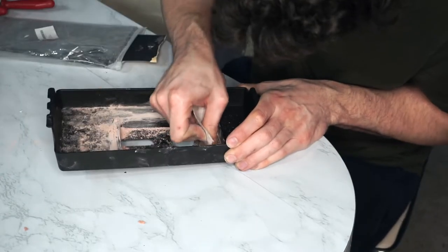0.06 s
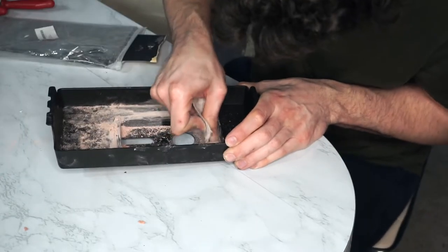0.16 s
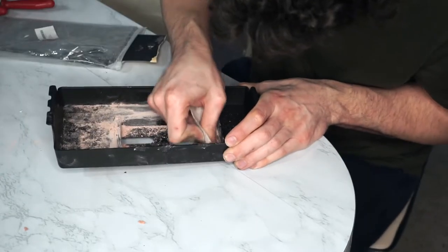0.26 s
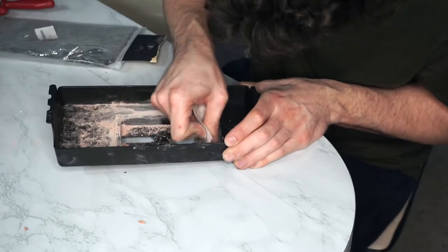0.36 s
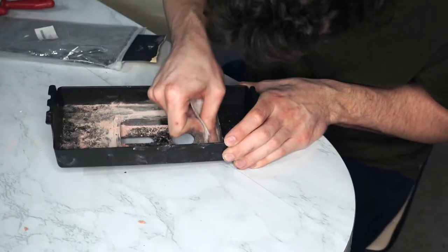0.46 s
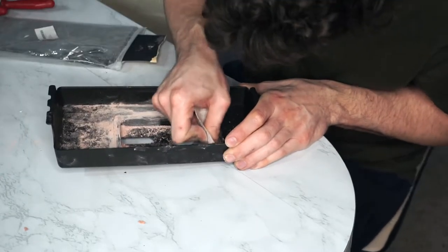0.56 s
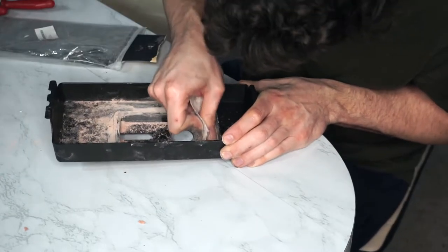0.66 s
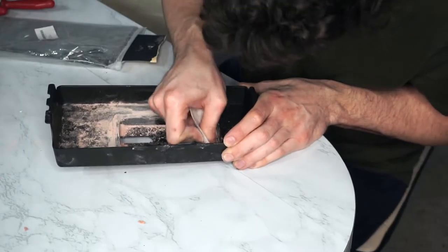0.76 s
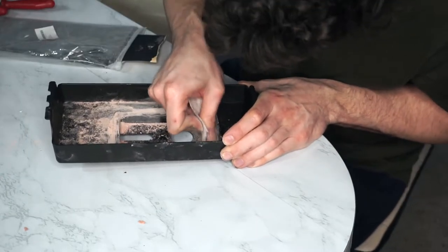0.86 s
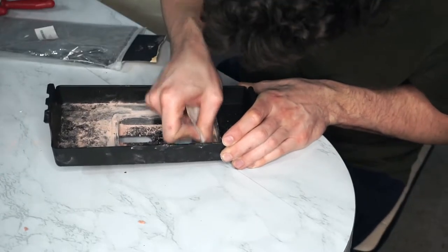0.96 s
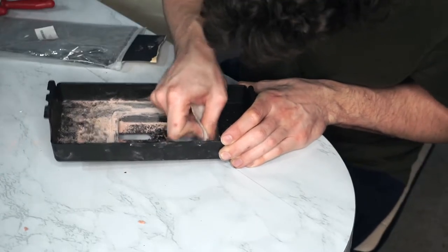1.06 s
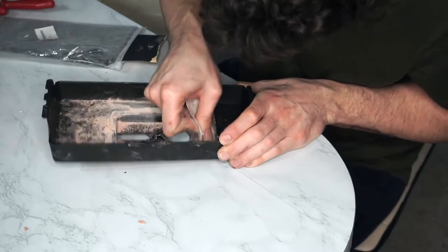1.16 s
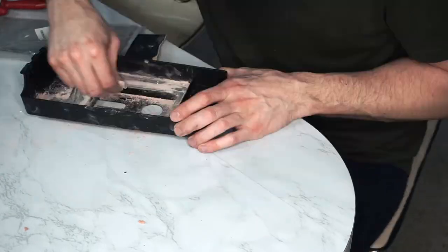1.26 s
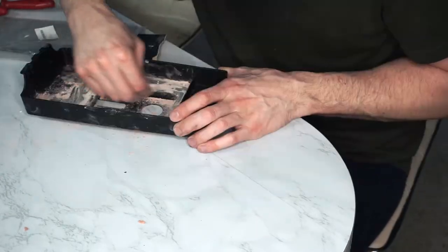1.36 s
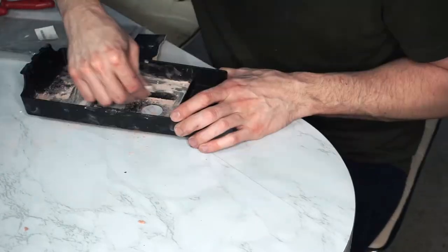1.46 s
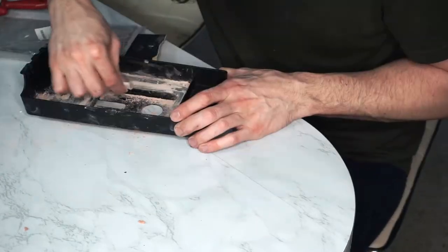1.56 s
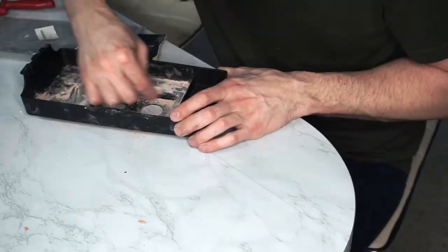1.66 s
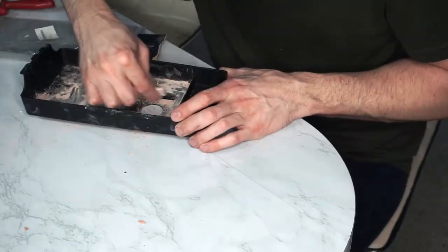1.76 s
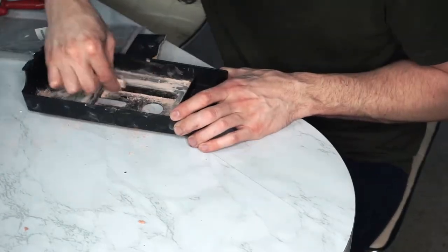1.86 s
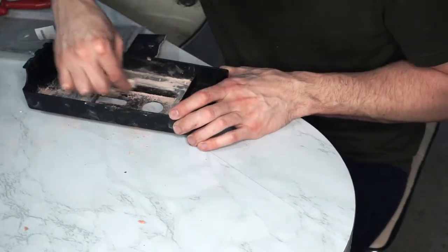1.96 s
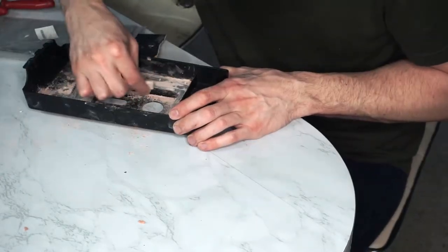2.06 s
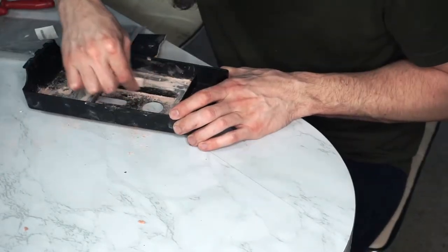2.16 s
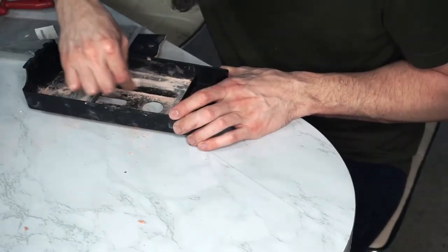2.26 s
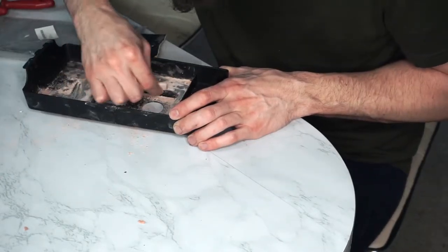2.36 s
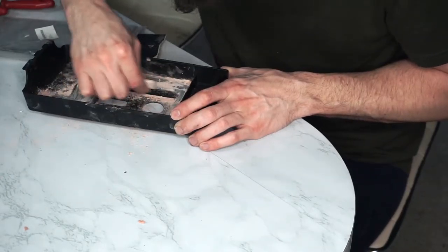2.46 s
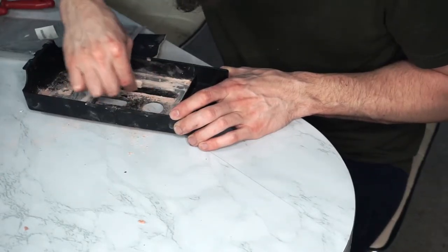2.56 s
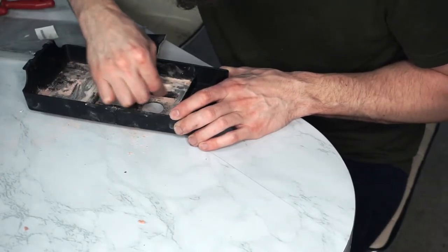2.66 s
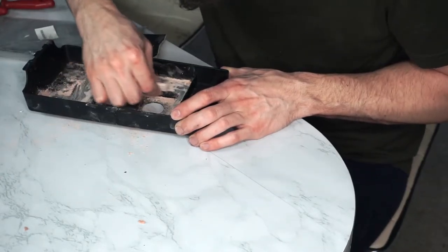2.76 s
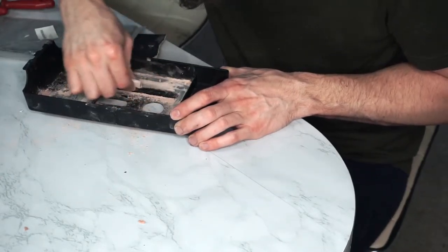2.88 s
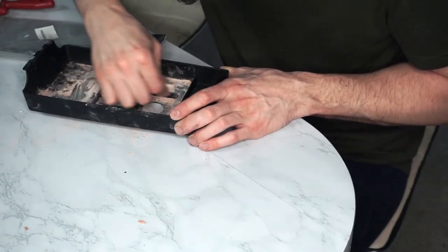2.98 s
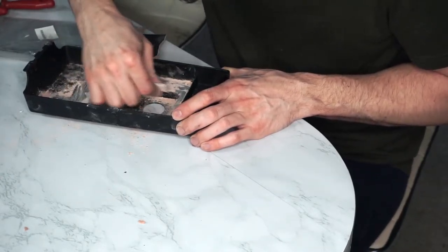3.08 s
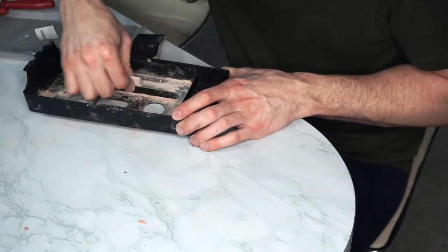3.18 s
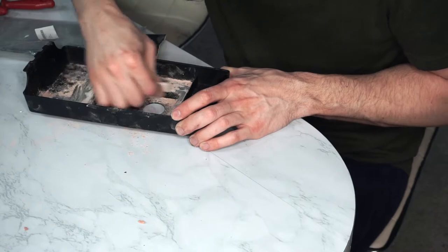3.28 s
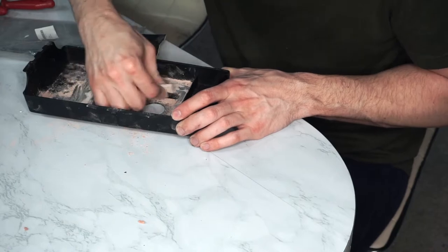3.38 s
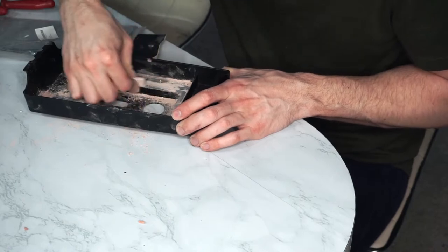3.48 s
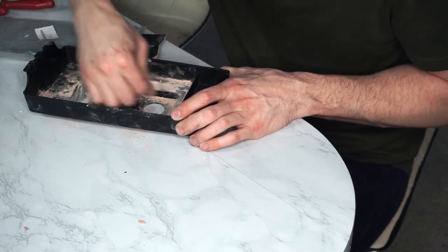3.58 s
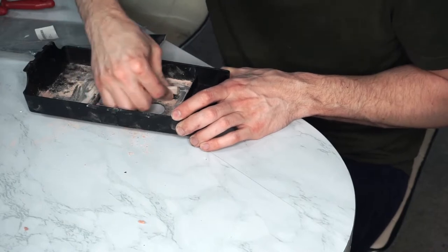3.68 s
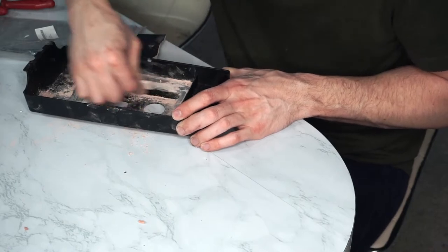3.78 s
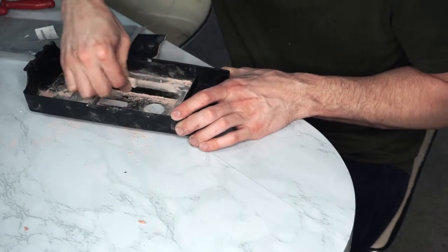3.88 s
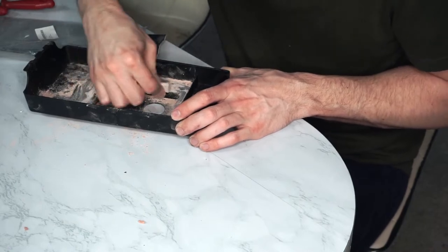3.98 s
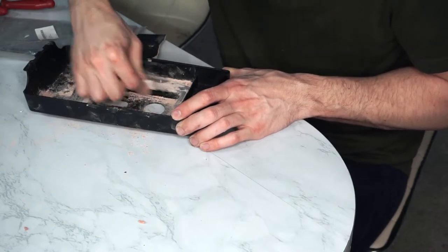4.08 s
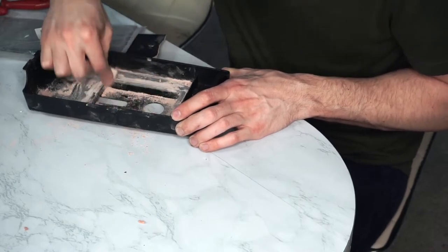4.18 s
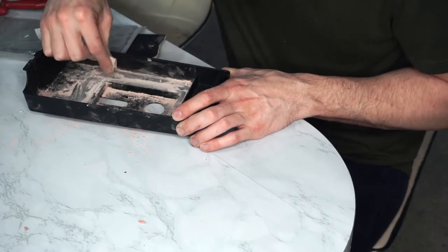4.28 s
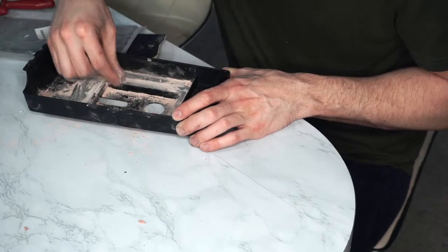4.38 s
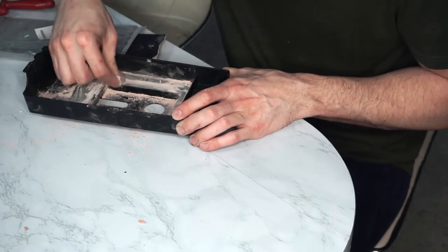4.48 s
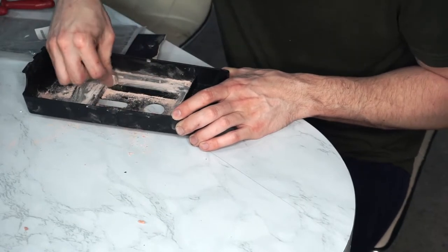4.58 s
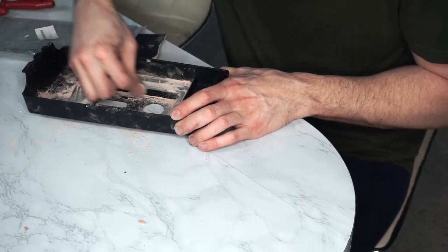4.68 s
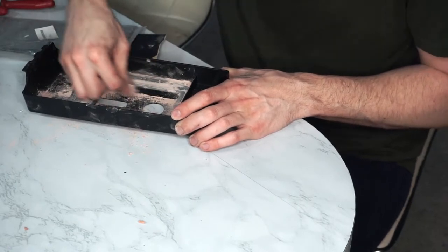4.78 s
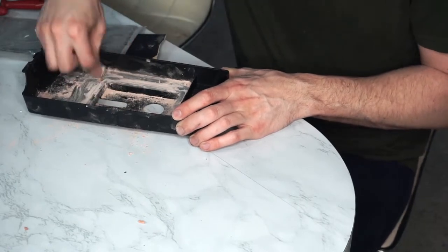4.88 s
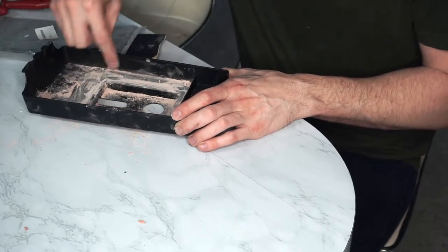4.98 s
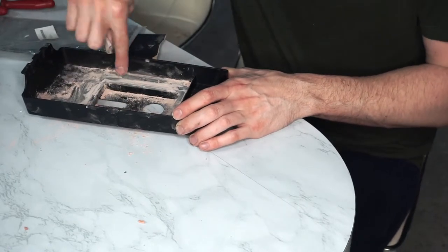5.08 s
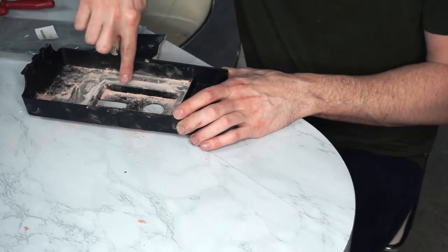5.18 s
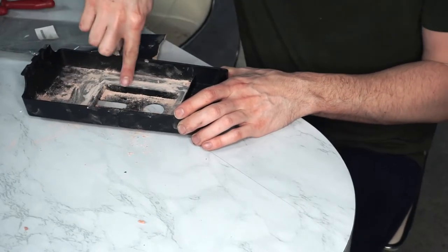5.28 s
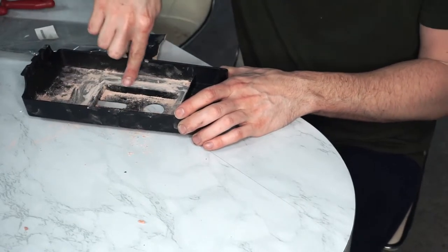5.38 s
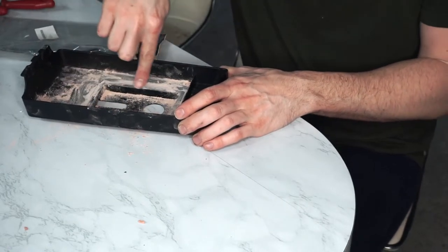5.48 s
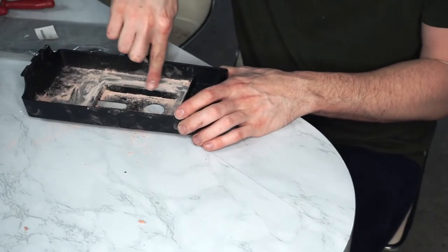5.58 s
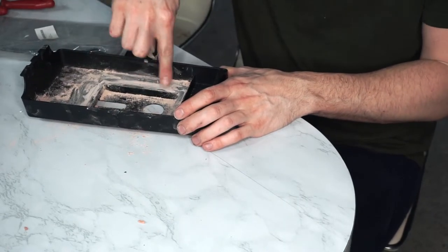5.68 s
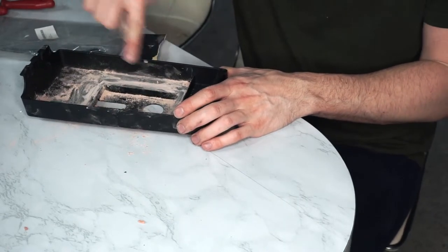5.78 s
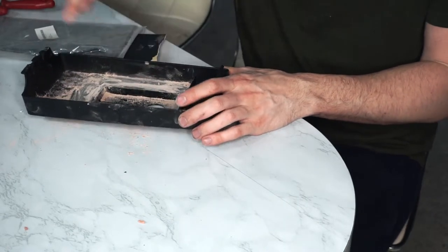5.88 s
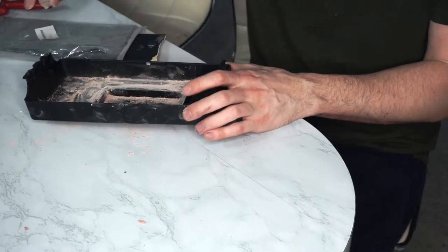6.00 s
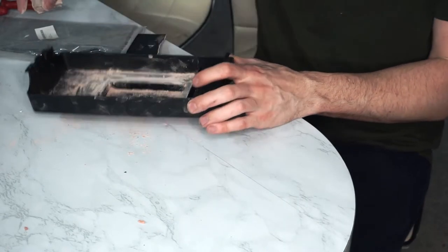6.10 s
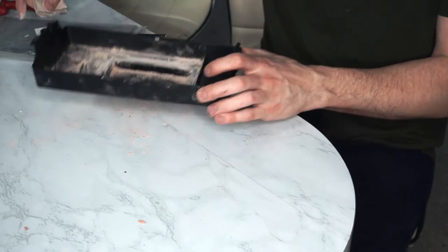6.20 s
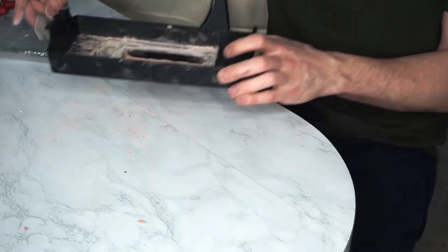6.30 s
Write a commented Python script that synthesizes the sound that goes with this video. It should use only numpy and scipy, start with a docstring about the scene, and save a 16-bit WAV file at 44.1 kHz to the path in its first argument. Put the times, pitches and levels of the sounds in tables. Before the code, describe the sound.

Quick, dry hand-sanding strokes scratch inside a plastic shell on a table, with occasional bumps and a faint fingertip wipe afterward.

```python
"""A dry, rasping to-and-fro, close up: sandpaper on hard filler inside a plastic tray on a table.
Short strokes in a corner give way to longer ones along the floor and a last few on the rim. The grit
hisses, rings the shell and rumbles the table. The paper snags at the turns, the tray is bumped a few
times, and at the end a fingertip wipes the dust, all in a small quiet room."""
import sys
import numpy as np
from scipy import signal
from scipy.fft import rfft, irfft
from scipy.io import wavfile
from scipy.ndimage import map_coordinates

SR = 44100
rng = np.random.default_rng(int(sys.argv[2]) if len(sys.argv) > 2 else 0)


def store_pcm(level_fs):
    """Save levels as 16-bit WAV."""
    pcm = np.round(np.clip(level_fs, -1, 1) * 32767).astype(np.int16)
    wavfile.write(sys.argv[1], SR, np.atleast_2d(pcm).T)


N = 279580
T = np.arange(N) / SR
HAND_SHIFTS_S = (1.28, 4.4)  # from corner to floor, from floor to rim

# Sanding strokes, pull and push in turn.
# Each row: start in seconds, length in seconds, hiss gain in dB, extra gain for the shell in dB.
STROKES = [(.021, 0.058, -40.5, -11), (0.142, 0.075, -43.5, -9), (0.259, .071, -36.5, -8),
           (0.384, 0.077, -39, -12.5), (0.506, 0.074, -34.5, -10.5), (.627, 0.071, -39, -10.5),
           (0.742, 0.064, -33.5, -8), (0.862, 0.058, -39, -9.5), (0.97, 0.075, -37, 3.5),
           (1.098, 0.048, -36, 4), (1.326, 0.1, -32.5, -3.5), (1.487, 0.11, -33.5, -3),
           (1.621, 0.14, -31, -5), (1.758, 0.18, -31, -7), (1.947, .13, -36, 0.5), (2.145, 0.11, -37, -1.5),
           (2.281, 0.13, -36.5, 0), (2.442, 0.14, -35.5, 4.5), (2.59, 0.14, -35.5, -2.5),
           (2.774, .13, -33.5, 0), (2.927, 0.12, -32.5, -3.5), (3.065, 0.17, -30.5, -1.5),
           (3.25, 0.11, -30.5, -5), (3.403, .14, -31, -2), (3.579, .11, -32, -5), (3.752, 0.14, -29, -8),
           (3.928, .1, -31.5, -1.5), (4.075, 0.15, -28.5, -5), (4.533, 0.079, -43, -30),
           (4.633, .126, -29.5, -4.5), (4.778, 0.17, -32.5, -2.5)]


def undb(db):
    """Decibels to amplitude."""
    return 10 ** (np.asarray(db) / 20)


def unit(x):
    """Scale to rms 1."""
    return x / np.sqrt(np.mean(x ** 2))


def curve_at(points, hz):
    """Read (Hz, value) points on a log-frequency axis."""
    point_hz, value = np.transpose(points)
    return np.interp(np.log(np.maximum(hz, 1)), np.log(point_hz), value)


def convolve(x, response):
    """Play a signal through an impulse response, cut to the scene's length."""
    return signal.fftconvolve(x, response)[:N]


def butter(x, order, hz, kind="low"):
    """Butterworth filter, low-pass by default."""
    return signal.lfilter(*signal.butter(order, hz, kind, fs=SR), x)


def colour(x, points, size=4096):
    """Minimum-phase EQ through (Hz, dB) points, built by folding the cepstrum."""
    cepstrum = irfft(np.log(undb(curve_at(points, np.fft.rfftfreq(size, 1 / SR)))))
    cepstrum[1:size // 2] *= 2
    cepstrum[size // 2 + 1:] = 0
    return convolve(x, irfft(np.exp(rfft(cepstrum))))


def resonate(x, modes):
    """Parallel resonances of alternating sign."""
    return sum((-1) ** k * undb(db) * signal.lfilter(*signal.iirpeak(hz, hz / width, SR), x)
               for k, (hz, width, db) in enumerate(modes))


def radiate(path, force, shape):
    """Send a force through a filter scaled to pass white noise at unchanged power."""
    return path(force, shape) / np.linalg.norm(path(signal.unit_impulse(8192), shape))


def wander(rate_hz):
    """Random drift with a spread near 1."""
    knots = rng.standard_normal(8192)
    return np.interp(T * rate_hz, np.arange(len(knots)), knots)


def stereo(mid, side, width):
    """Left and right from mid and side; an EQ on the side sets the width by frequency."""
    return mid + np.array([[1], [-1]]) * colour(side, width)


def room_tone(waver_db=1.5):
    """A soft, wavering rush of air with a little hum and faint electronic whine."""
    # Colour of the rush. Each row: frequency in Hz, gain in dB.
    spectrum = [(15, -64), (25, -36), (48, -27), (87, -21.5), (134, 0.5), (200, -4.5), (301, 1), (384, 0),
                (677, 1), (796, -1), (3720, -26), (5000, -21), (5570, -20), (9840, -29.5), (16000, -36)]
    # Its slow fade. Each row: time in seconds, level in dB.
    fade = [(0, -57), (4.4, -59), (5.2, -59.5), (5.8, -61.5), (6.34, -63)]
    # Its stereo width. Each row: frequency in Hz, side over mid in dB.
    width = [(60, 0), (130, -13.5), (380, -13), (1200, -18), (2400, -0.5), (4400, 3.5), (8000, -1),
             (15000, 3)]
    # Hum and whine. Each row: frequency in Hz, rms level in dB.
    tones = [(60, -87), (147, -84), (180, -79.5), (9711, -90), (12900, -98)]
    level_db = np.interp(T, *np.transpose(fade))
    mid, side = (unit(colour(rng.standard_normal(N), spectrum)) * undb(level_db + waver_db * wander(7.2))
                 for _ in range(2))
    hum = sum(np.sqrt(2) * undb(db) * np.sin(2 * np.pi * hz * T) for hz, db in tones)
    return stereo(mid, side, width) + hum


def room_tail(predelay_s, size=24000):
    """Dense reflections that die away at their own pace in each octave."""
    # The room's decay. Each row: frequency in Hz, seconds to fall 60 dB.
    decay = [(200, 0.13), (600, 0.49), (1400, 0.31), (4000, 0.31), (10000, 0.21)]
    t, hz = np.arange(size) / SR, np.fft.rfftfreq(size, 1 / SR)
    noise = rfft(rng.standard_normal(size))
    octave = np.round(np.log2(np.maximum(hz, 100)))
    tail = sum(irfft(noise * (octave == k)) * 1000. ** (-t / curve_at(decay, 2 ** k))
               for k in np.unique(octave))
    tail *= t > predelay_s
    return tail / np.linalg.norm(tail)


def reflections(x, predelay_s, count=4):
    """The moving hand and tray keep changing the room's pattern of reflections."""
    position = 2 * np.pi * (3 * T + 0.49 * wander(3.044))
    sends = (x * np.cos(position * (k + 1) / count) for k in range(count))
    return sum(convolve(send, room_tail(predelay_s)) for send in sends) * np.sqrt(2 / count)


def grit(per_s, spread_db, bed_db, chatter_db, chatter_hz):
    """Uneven grains tear at the filler over a bed of finer ones, chattering as they slide."""
    clicks = (rng.random(N) < per_s / SR) * rng.choice([-1, 1], N)
    sizes = undb(spread_db * np.minimum(rng.exponential(size=N), 5))
    bed = undb(bed_db) * rng.standard_normal(N)
    chatter = undb(chatter_db * wander(chatter_hz))
    return unit((unit(clicks * sizes) + bed) * chatter)


def fingertip(soft_hz=2600):
    """Soft skin drags dust off the filler, stirring only low shell resonances, with no hiss."""
    # The wipes. Each row: start in seconds, length in seconds, gain in dB.
    wipes = [(5.436, 0.068, -54), (5.496, 0.11, -56.5), (5.61, 0.081, -54.5)]
    # The shell under the finger. Each row: frequency in Hz, bandwidth in Hz, gain in dB.
    modes = [(1166, 60, 5.5), (2230, 150, -3)]
    pressure = sum(undb(db) * np.sin(np.pi * np.clip((T - s) / length, 0, 1)) for s, length, db in wipes)
    dust = grit(per_s=220, spread_db=5.5, bed_db=6, chatter_db=2.5, chatter_hz=69)
    return radiate(resonate, butter(pressure * dust + 1e-18, 2, soft_hz), modes)


def knocks(contact_s=0.00081, lowest_hz=110, size=12000):
    """The tray bumps the table and knuckles bump the tray; a harder blow favours the higher modes."""
    # The bumps. Each row: start in seconds, peak in dB, hardness as a tilt in dB per octave.
    blows = [(1.872, -14.5, 16), (1.8783, -16, 9), (2.396, -29, 13), (4.193, -21, 32), (4.4316, -23, -2),
             (4.442, -44, -6), (4.859, -31, 6), (4.876, -22.5, 9.5), (4.941, -31, 33)]
    # The struck tray. Each row: frequency in Hz, seconds to fall 60 dB, gain in dB.
    modes = [(115, 0.036, -27), (162, 0.08, -33), (205, 0.06, -21), (325, 0.059, -7.5), (428, 0.03, 4.5),
             (556, 0.0089, 6.5), (764, 0.021, 1.5), (966, 0.035, -0.5), (1165, 0.059, -1),
             (1347, 0.028, -0.5), (1980, 0.008, -7)]
    out, t = np.zeros(N + size), np.arange(size) / SR
    hz, t60, db = np.transpose(modes)[:, :, None]
    attack = 1 - np.exp(-(t / contact_s) ** 2)
    for s, peak_db, hardness in blows:
        decays = undb(db + hardness * np.log2(hz) - 60 * t / t60)
        partials = decays * np.sin(2 * np.pi * (hz * t + rng.random(hz.shape)))
        ring = butter(partials.sum(axis=0) * attack, 2, lowest_hz, "high")  # small shell, no deep bass
        out[int(s * SR):][:size] += undb(peak_db) * ring / np.abs(ring).max()
    return out[:N]


def cupped_hand(low_hz=401, high_hz=1058, half_width_hz=95, gain_db=-21):
    """On the tray floor the hollow under the hand resonates, opening on pulls and shrinking on pushes."""
    out = np.zeros(N)
    breath = unit(butter(rng.standard_normal(N), 2, half_width_hz))
    for k, (s, length, db, _) in enumerate(STROKES):
        if HAND_SHIFTS_S[0] < s < HAND_SHIFTS_S[1]:
            progress = np.linspace(0, 1, int(length * SR))
            closure = (1 + (-1) ** k * np.cos(np.pi * progress)) / 2
            hz = low_hz * (high_hz / low_hz) ** closure
            swell = undb(db + gain_db) * np.sqrt(np.abs(np.sin(np.pi * progress)))
            span = slice(int(s * SR), int(s * SR) + len(progress))
            out[span] += swell * breath[span] * np.sin(2 * np.pi * np.cumsum(hz) / SR)
    return out


def tray_echoes(x, strength, lag_s, glide, count=4):
    """Tray walls and knuckles reflect the scrape: a comb colour that slides as the hand travels."""
    n = np.arange(len(x))
    travel = np.cos(np.pi * n / len(x)) * min(len(x) / SR / .1, 1)  # slides under 0.1 s travel less
    centre_lags = rng.uniform(0.13, 1, (count, 1)) * lag_s * SR
    lags = centre_lags * (1 + glide * rng.uniform(-0.86, 1, (count, 1)) * travel)
    gains = strength * rng.choice([-1, 1], count)
    echoes = sum(gain * map_coordinates(x, [n - lag], order=3, mode="grid-wrap")
                 for gain, lag in zip(gains, lags))
    return unit(x + echoes)


def swing(length_s, bite, grip_s):
    """Sliding speed: half a sine, of which the share `bite` is already done when the paper grips."""
    t = np.arange(int(length_s * SR)) / SR
    arc = np.abs(np.sin(np.pi * (bite + (1 - bite) * t / length_s)))
    return arc * np.minimum(t / grip_s, 1)


def slides(snag_table_db=-30.5):
    """Every stroke and snag: start in seconds, speed curve, then hiss, shell, table and edge gains in dB."""
    # How the paper grips in the corner, on the floor and on the rim.
    # Each row: bite as a share of the swing, edge gain in dB, table gain in dB on pull and on push.
    grips = [(0.17, 5.5, -45, -54), (0.15, 0.5, -45.5, -47.5), (0.18, 3, -66, -70)]
    # The paper or a finger catches. Each row: start in seconds, length in seconds, hiss gain in dB,
    # extra gain for the shell in dB, edge gain in dB.
    snags = [(0.248, 0.016, -50.5, -18, 6), (.264, 0.0081, -43, -17, 7), (0.576, 0.052, -49.5, -2, -6),
             (0.976, 0.011, -43, -8, 4), (1.095, 0.023, -29.5, -1, -4), (1.145, 0.03, -49, 13.5, -7),
             (1.728, 0.0026, -20.5, -9.5, 8.5), (1.835, 0.011, -29.5, -17, 4),
             (1.8595, 0.024, -32.5, 1, -21), (1.876, 0.019, -46, 20, -10), (2.133, 0.018, -49.5, -14, 4),
             (2.153, 0.0075, -39, -1, 11), (2.292, 0.0074, -41, -15, -12), (2.395, 0.0064, -38, -11, -1),
             (2.427, 0.045, -38, -1, -4), (2.44, 0.011, -22, -24, -6.5), (2.758, 0.0073, -41, -12, 12),
             (3.07, 0.014, -41, 6.5, 4), (3.396, 0.0059, -40.5, -2, -19), (3.725, 0.0074, -36.5, -16, -10),
             (3.734, 0.055, -49, 8, -18), (4.057, 0.021, -43.5, -20, -14), (4.192, 0.0037, -27, 1, 11),
             (4.419, 0.023, -44, -20, 5.5), (4.524, 0.0045, -51.5, -13, 24), (4.836, 0.049, -44, 11, -11),
             (4.872, 0.0099, -26.5, -9, 2), (4.937, 0.0059, -37, 3, -10), (5.119, 0.019, -62, -19, 3),
             (5.184, 0.0064, -56, -24, 8), (5.643, 0.048, -65.5, -14, -20), (5.741, 0.0056, -61, 0, 8),
             (5.987, 0.0095, -61, -17, 4), (6.323, 0.0092, -63.5, 11, -4)]
    for k, (s, length, db, ring_db) in enumerate(STROKES):
        bite, edge_db, *table_db = grips[np.searchsorted(HAND_SHIFTS_S, s)]
        yield s, swing(length, bite, grip_s=0.0032), db, db + ring_db, table_db[k % 2], edge_db
    for s, length, db, ring_db, edge_db in snags:
        yield s, swing(length, bite=.33, grip_s=0.00129), db, db + ring_db, db + snag_table_db, edge_db


def tray_body(hiss, shell, table, hiss_db=-2.0, shell_db=-1.5, table_db=-4.5):
    """Tray and table colour the scrape; each place on the tray drives its own shell resonances."""
    # The shell rubbed in each place. Each row: frequency in Hz, bandwidth in Hz, gain in dB.
    corner_modes = [(1166, 71, 2), (1440, 330, -3.5), (1870, 340, 3), (2220, 630, -6), (3560, 160, -8)]
    floor_modes = [(1006, 216, -7), (1178, 27.6, 5), (1286, 78, -4.5), (1460, 9.7, -2), (1546, 100, -9),
                   (1707, 180, -7), (2120, 320, -7.5), (2440, 29.5, -13), (3040, 85, -9),
                   (5000, 190, -15.5)]
    rim_modes = [(1120, 125, 0), (1293, 120, -0.5), (1554, 114, -1), (1990, 220, -0.5), (2210, 390, -3.5),
                 (3100, 160, -12.5), (4460, 77, -20)]
    # Colour of the corner hiss, the hiss elsewhere and the table. Each row: frequency in Hz, gain in dB.
    corner_eq = [(500, -27), (1200, -6), (2400, -0.5), (3400, 2.5), (4600, 0), (5400, -2), (7000, -4),
                 (8500, -4.5), (10000, -10.5), (13000, -17.5), (16000, -34)]
    open_eq = [(500, -47), (1200, -5.5), (2000, -6.5), (3100, 3.5), (4200, -0.5), (4700, 1), (5400, -3),
               (7000, -3), (9000, -5), (11000, -8), (13500, -15.5), (16000, -27.5)]
    table_eq = [(50, -25.5), (110, -33), (170, -8.5), (260, -9.5), (320, -5), (440, 3), (620, 6),
                (800, -1.5), (1100, -12), (2000, -16), (6000, -58)]
    place = np.searchsorted(HAND_SHIFTS_S, T)
    ring = sum(radiate(resonate, shell * (place == k) + 1e-18, modes)
               for k, modes in enumerate((corner_modes, floor_modes, rim_modes)))
    rasp = radiate(colour, hiss * (place == 0), corner_eq) + radiate(colour, hiss * (place > 0), open_eq)
    rumble = radiate(colour, table, table_eq)
    return undb(hiss_db) * rasp + undb(shell_db) * ring + undb(table_db) * rumble


def sanding(edge_hz=6500, drag_top_hz=5530, drag_shell_db=-2.5, drag_table_db=-2):
    """Speed and pressure scale the grit, which hisses directly, rings the shell and shakes the table."""
    # Light rubbing of the resting paper. Each row: time in seconds, gain in dB.
    drag_curve = [(0, -56), (.6, -57), (1.17, -51), (1.28, -72), (1.31, -43), (1.75, -47.5), (1.99, -43.5),
                  (2.12, -53.5), (2.42, -50), (2.58, -47), (2.75, -61), (3.2, -52.5), (4.22, -67.5),
                  (4.36, -67), (4.61, -67), (4.76, -56), (5.0, -73), (6.34, -71.5)]
    fine = grit(per_s=5000, spread_db=1.0, bed_db=7.0, chatter_db=1.64, chatter_hz=340)
    coarse = grit(per_s=1500, spread_db=2.0, bed_db=-1, chatter_db=3.5, chatter_hz=120)
    bumps = grit(per_s=500, spread_db=5, bed_db=0, chatter_db=4.5, chatter_hz=42)
    hiss, shell, table = np.zeros((3, N))
    for s, speed, db, ring_db, rumble_db, edge_db in slides():
        start = int(s * SR)
        speed = speed[:N - start]
        span = slice(start, start + len(speed))
        scrape = tray_echoes(fine[span], strength=0.29, lag_s=0.001366, glide=0.18)
        grind = tray_echoes(coarse[span], strength=0.23, lag_s=0.002885, glide=0.097)
        # the sheet's bare edge is brighter than its padded middle, and speaks most at full speed
        pad = speed ** 1.29 * butter(scrape, 4, edge_hz)
        edge = undb(edge_db) * speed ** 2.2 * butter(scrape, 4, edge_hz, "high")
        hiss[span] += undb(db - edge_db / 3) * (pad + edge)
        shell[span] += undb(ring_db) * speed ** 1.01 * grind
        table[span] += undb(rumble_db) * speed ** 0.43 * unit(bumps[span])
    # between strokes the paper never quite rests, and slow rubbing is dull
    drag = undb(np.interp(T, *np.transpose(drag_curve)))
    hiss += drag * butter(fine[::-1], 1, drag_top_hz)
    shell += undb(drag_shell_db) * drag * coarse[::-1]
    table += undb(drag_table_db) * drag * bumps[::-1]
    return tray_body(hiss, shell, table)


def scene(mid_db=-10, side_db=-10):
    """The tray straight ahead, with a small room around it."""
    # Stereo width of the reflections. Each row: frequency in Hz, side over mid in dB.
    width = [(60, -4), (250, -13), (600, -9.5), (1200, -46), (2000, -23), (4000, -7), (9000, -1),
             (16000, -4.5)]
    direct = sanding() + cupped_hand() + knocks() + fingertip()
    mid = undb(mid_db) * reflections(direct, predelay_s=0.0031)
    side = undb(side_db) * reflections(direct, predelay_s=.002)
    return direct + stereo(mid, side, width) + room_tone()


def record(dry, top_hz=15900):
    """A steep low-pass cuts the very top."""
    return signal.sosfilt(signal.ellip(10, .2, 70, top_hz, fs=SR, output="sos"), dry)


dry = scene()
out = record(dry)
store_pcm(out)
```